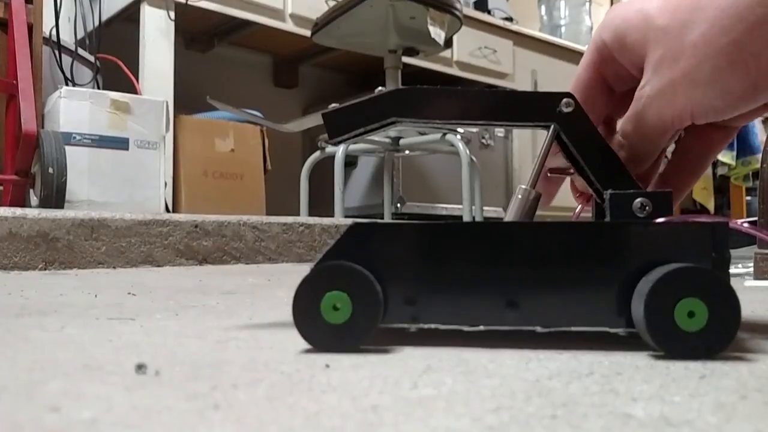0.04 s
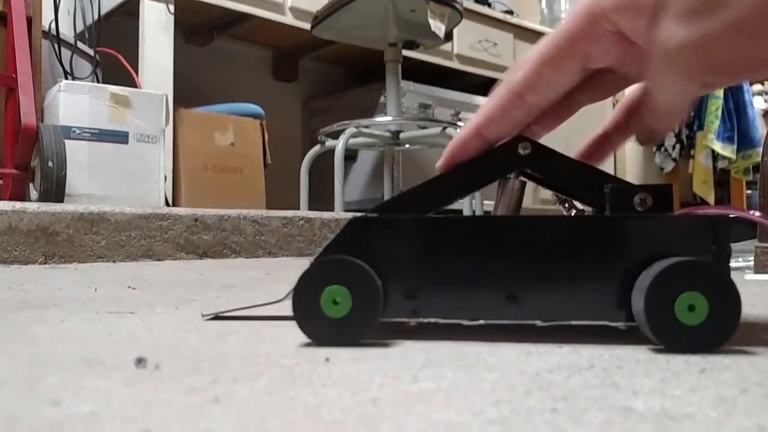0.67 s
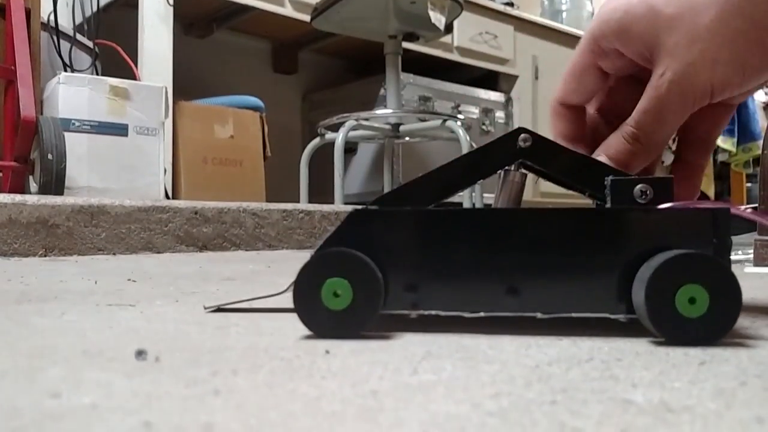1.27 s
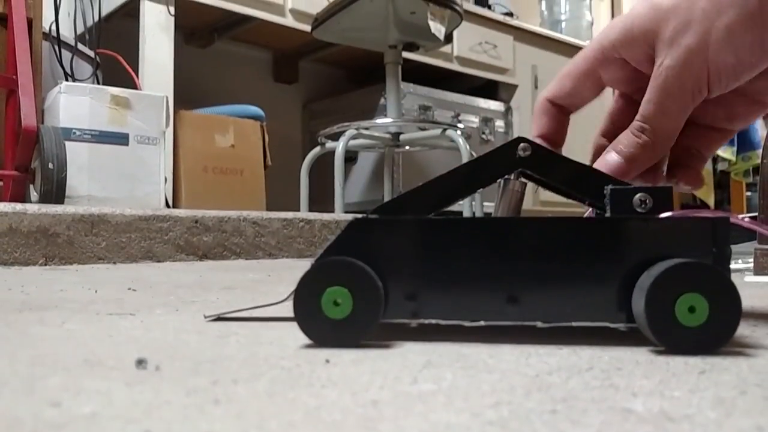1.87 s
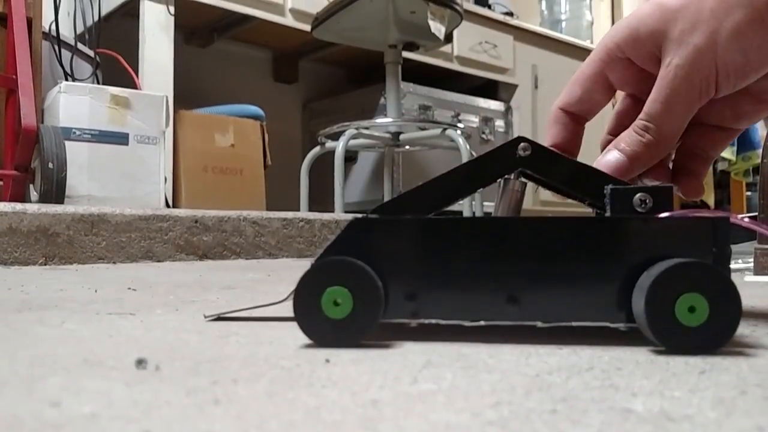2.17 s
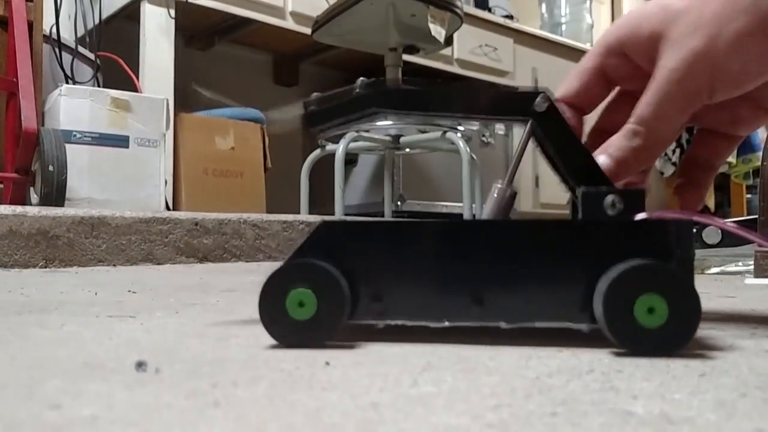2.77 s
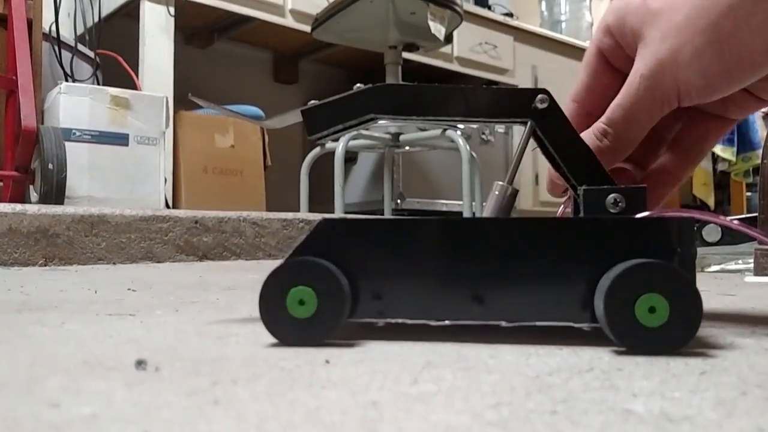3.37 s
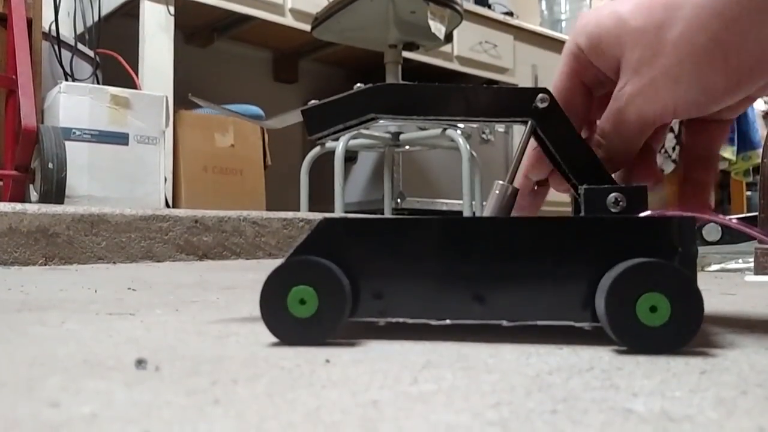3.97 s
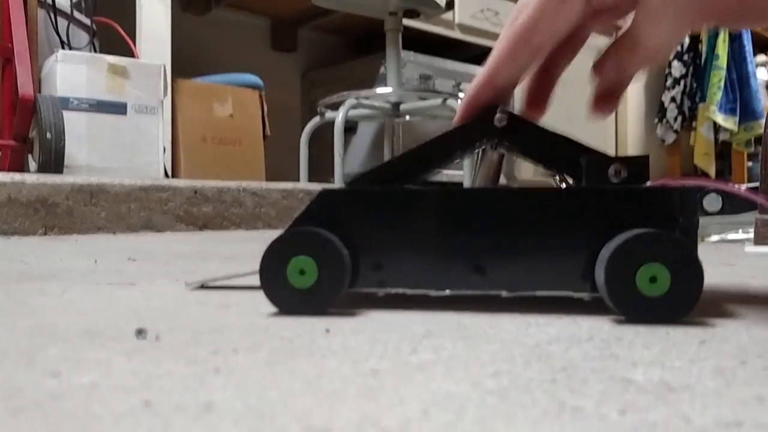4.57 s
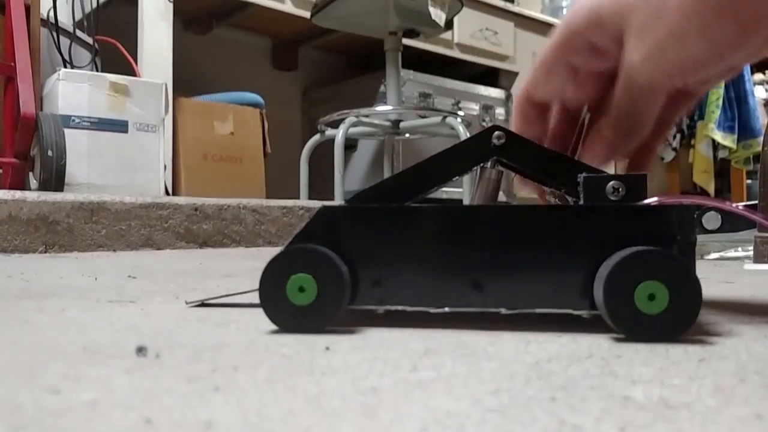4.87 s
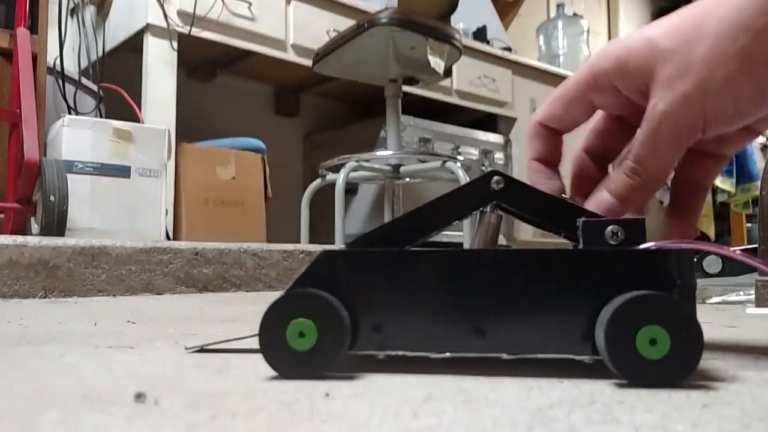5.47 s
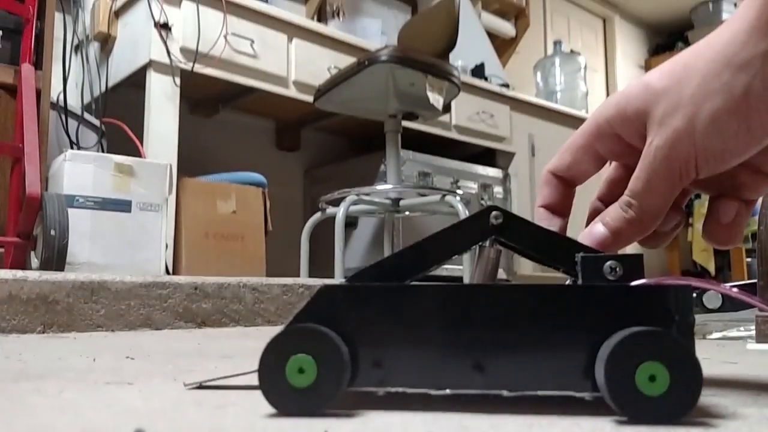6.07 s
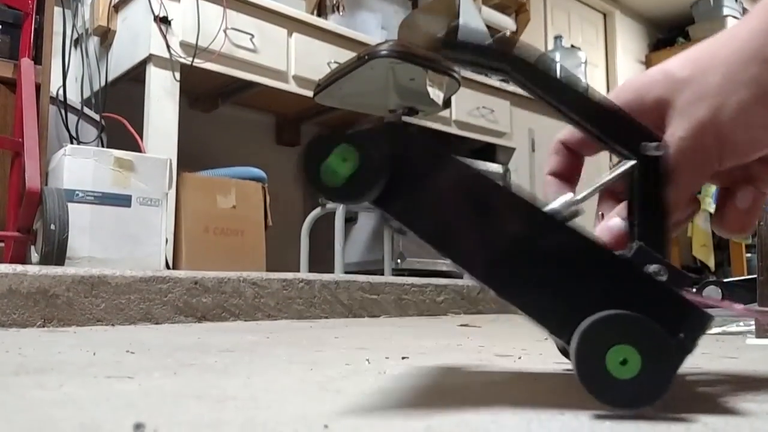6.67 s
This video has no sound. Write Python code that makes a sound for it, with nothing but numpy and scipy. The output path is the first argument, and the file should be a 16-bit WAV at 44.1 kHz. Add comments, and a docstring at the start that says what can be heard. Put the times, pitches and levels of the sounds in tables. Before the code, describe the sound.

Close to the microphone in a garage, a small robot's metal arm is pushed shut with a light clack. Its pneumatic flipper then fires with a loud, rattling snap, and the robot clatters back onto concrete. Faint handling ticks, a short puff of air and another closing clack follow, before a second loud snap at the very end. A low motor hum runs quietly behind it all.

```python
"""Pneumatic flipper robot in a garage

A small metal robot on the concrete floor, close to one microphone, fires its flipper twice.
The arm slams into its stop and chatters; after the first shot the robot lands and bounces.
A valve puffs the air out, a hand pushes the arm shut, and a motor hums in the room behind.
The recorder's limiter ducks on each shot and lets the hum swell back slowly."""
import sys
import numpy as np
from scipy import signal
from scipy.fft import rfft, irfft, next_fast_len
from scipy.io import wavfile
from scipy.ndimage import uniform_filter1d

SR = 44100
rng = np.random.default_rng(int(sys.argv[2]) if len(sys.argv) > 2 else 0)


def inscribe(sig):
    """Save sig as 16-bit PCM at rate SR to the path in sys.argv[1].

    A 1-D sig is mono; a 2-D sig holds one channel per row.
    Samples are clipped to [-1, 1] before scaling.
    """
    pcm = np.round(np.clip(np.atleast_2d(sig).T, -1, 1) * 32767)
    wavfile.write(sys.argv[1], SR, pcm.astype(np.int16))


N = 296793

# Levels are those ahead of the limiter. the flipper fires: start_s, stop_db, rebound_db and late_knock_db
# (relative to the stop), rebound_loss_db
SHOTS = [(2.4683, 15.5, -10, -11.5, 2.17), (6.6179, 14.5, -10.5, -14, 1.7)]
# modes of the arm and chassis: pitch_hz, level_db, t60_s
METAL_MODES = [(771, -3, 0.044), (796, -2, 0.028), (848, -1, 0.067), (958, 8.5, 0.016), (1050, -3.5, 0.079),
               (1262, 5.5, 0.019), (1358, -9, 0.038), (1464, 3.5, 0.035), (1620, -13.5, 0.021),
               (1742, -16.5, 0.056), (2035, -0.5, 0.029), (2430, -26, .02), (3180, -15.5, .02),
               (3670, -15, 0.032)]
# spectrum of a hard contact's crack: frequency_hz, density_db
CRACK_SPECTRUM = [(60, -4), (200, 4.5), (550, -3), (1400, 5.5), (2600, -1.5), (3900, -6.5), (5200, -14.5),
                  (8000, -21), (12000, -30), (16000, -36)]
# the robot bounces on the concrete: start_s, level_db, low_hz, knock_count
LANDINGS = [(2.7708, 0, 680, 5), (2.861, -11.5, 1300, 2), (2.938, -24, 1600, 1)]
# the arm is pushed shut: start_s, level_db, gap_s, knock_loss_db, low_hz, high_hz, crack_db
CLOSINGS = [(0.720, -14.5, 0.0058, 0.7, 684, 1320, -10.5), (4.6455, -15, 0.01, 4.5, 480, 1620, -9.5)]
# the arm shifts in its joints under the hand: start_s, level_db, low_hz, high_hz, crack_db
JOINT_TAPS = [(.307, -33, 350, 1480, -13), (.847, -29, 1260, 1900, -28), (1.242, -43, 2360, 4230, 3),
              (3.402, -29.5, 1210, 2500, -12), (4.178, -34, 800, 4000, -11)]
# fingers tick and bump on the linkage and hose: start_s, level_db, pitch_hz, width_hz, t60_s
FINGER_TOUCHES = [(2.041, -57.5, 7900, 7000, 0.022), (2.963, -43.5, 2880, 1510, 0.075),
                  (3.879, -50.5, 7400, 6000, 0.021), (5.283, -23.5, 142, 110, 0.053)]
# the valve vents: start_s, level_db
PUFFS = [(-.055, -25.5), (3.738, -22.5)]
# spectrum of the air jet: frequency_hz, density_db
JET_SPECTRUM = [(100, -24), (350, 1), (750, -2), (1100, -8), (1450, -0.5), (2400, -4), (4300, -9),
                (7500, -7), (11000, -14), (15500, -20)]
# cavities that the jet sounds: pitch_hz, width_hz, boost_db
JET_CAVITIES = [(910, 230, 14), (1934, 45, 17.5), (2970, 60, 8.8), (3170, 75, 4.7)]
# tones of the motor and its housing: pitch_hz, level_db
HUM_TONES = [(59.2, -63.5), (74, -55), (118.4, -53.5), (148, -51.5), (220.7, -49.5), (239, -51.5),
             (331, -55), (354.6, -46.5), (603, -59), (1184, -61)]
# rush of air behind the hum: frequency_hz, density_db
AIR_SPECTRUM = [(20, -8.5), (45, -6), (90, -4), (160, 0), (330, -2), (420, -6.5), (700, -11), (1200, -15),
                (1900, -28.5), (2600, -30.5), (4000, -41.5), (7000, -49), (15000, -56.5)]
# reverberation of the garage: frequency_hz, t60_s
GARAGE_DECAY = [(150, 0.53), (1000, 0.35), (2000, 0.39), (5000, 0.51), (13000, 0.23)]


def flipper(stroke_s=0.0232, chatter_gap_s=0.0117, late_knock_s=0.0455):
    """The piston takes up the slack, the arm slams into its stop and chatters, and one late rebound lands as a
    dull knock."""
    # kinds of contact: low_hz, high_hz, crack_db
    slack, slam = (560, 3200, -11), (850, 1600, -14)
    chatter, late_knock = (850, 1600, -11.5), (700, 1150, -16)
    thump = (318, 280, 0.037)  # the piston bottoms out: pitch_hz, width_hz, t60_s
    hits, thumps = [], []
    for start_s, stop_db, rebound_db, late_knock_db, loss_db in SHOTS:
        stop_s = start_s + stroke_s
        hits += bounces(start_s, stop_db - 30.5, gap_s=0.0036, step_db=2.5, contact=slack, count=3)
        hits.append((stop_s, stop_db, *slam))
        hits.append((stop_s + late_knock_s, stop_db + late_knock_db, *late_knock))
        hits += bounces(stop_s + chatter_gap_s, stop_db + rebound_db, chatter_gap_s, -loss_db,
                        chatter, count=7)
        thumps.append((stop_s, stop_db - 12.5, *thump))
    return metal_blows(hits) + rings(thumps)


def metal_blows(hits, scatter_db=3.0, detune=0.017, scatter_turns=0.17, contact_s=0.00089):
    """Each blow rings the metal, mainly the modes between low_hz and high_hz, and adds a short crack."""
    out, t = np.zeros(N), seconds(.15)
    hz, mode_db, t60_s = np.array(METAL_MODES).T[:, :, None]
    decay = dying(t, t60_s)
    for start_s, level_db, low_hz, high_hz, crack_db in hits:
        strength, shift, lag = rng.standard_normal((3, len(hz), 1))
        reach = 1 / np.sqrt((1 + (low_hz / hz) ** 4) * (1 + (hz / high_hz) ** 4))
        gains = reach * from_db(mode_db + scatter_db * strength)
        # loose joints shift the modes a little, and each reaches the microphone by its own path
        turns = hz * (1 + detune * shift) * t + scatter_turns * lag
        ring = np.sum(gains * decay * np.cos(2 * np.pi * turns), axis=0)
        # the hardest blows make the briefest contact, and so the sharpest crack
        quick_t = t * from_db(0.13 * max(level_db, 0))
        ring *= rising(quick_t, contact_s)
        crack = noise(CRACK_SPECTRUM, len(t))
        crack *= rising(quick_t, rise_s=0.0037) * dying(quick_t, t60_s=0.047)
        onset_height = np.sqrt(2 * np.mean(ring[t < .003] ** 2))
        add(out, start_s, from_db(level_db) * (ring / onset_height + from_db(crack_db) * crack))
    return out


def bounces(start_s, level_db, gap_s, step_db, contact, count, thinning=1):
    """List evenly spaced blows that step in level; thinning multiplies the low edge at each one."""
    low_hz, high_hz, crack_db = contact
    return [(start_s + k * gap_s, level_db + k * step_db, low_hz * thinning ** k, high_hz, crack_db)
            for k in range(count)]


def rings(rows):
    """Thumps, pings and ticks: bands of noise that die quickly."""
    out, t = np.zeros(N), seconds(.2)
    for start_s, level_db, pitch_hz, width_hz, t60_s in rows:
        ring = band(rng.standard_normal(len(t)), pitch_hz - width_hz / 2, pitch_hz + width_hz / 2)
        add(out, start_s, from_db(level_db) * unit_rms(ring) * dying(t, t60_s))
    return out


def landings(high_hz=2350, crack_db=-8):
    """The robot drops back on its wheels; each bounce is lighter and thinner and shakes the loose arm."""
    hits = []
    for start_s, level_db, low_hz, knocks in LANDINGS:
        hits += bounces(start_s, level_db, gap_s=0.0135, step_db=-3,
                        contact=(low_hz, high_hz, crack_db), count=knocks, thinning=1.23)
    return metal_blows(hits)


def closings():
    """The arm's scoop bounces on the floor in a tight triple clack while its thin tip pings."""
    ping = (10280, 600, 0.063)  # pitch_hz, width_hz, t60_s
    hits, pings = [], []
    for start_s, level_db, gap_s, loss_db, *contact in CLOSINGS:
        hits += bounces(start_s, level_db, gap_s, -loss_db, contact, count=3)
        pings.append((start_s, level_db - 32, *ping))
    return metal_blows(hits) + rings(pings)


def valve(attack_s=0.018, swell_db=31, hold_s=0.022):
    """The cylinder empties in a short jet that sounds the hollow chassis and the room."""
    out, t = np.zeros(N), seconds(.1)
    opening = from_db(swell_db * np.minimum(t / attack_s - 1, 0))
    emptying = dying(np.maximum(t - attack_s - hold_s, 0), t60_s=0.058)
    for start_s, level_db in PUFFS:
        jet = opening * emptying * noise(JET_SPECTRUM, len(t), JET_CAVITIES)
        add(out, start_s, garage(from_db(level_db) * jet, wet_db=-14.0))
    return out


def handling():
    """The hand nudges the arm, ticks on the linkage and scuffs the hose."""
    return metal_blows(JOINT_TAPS) + rings(FINGER_TOUCHES) + scuffs()


def scuffs(start_s=2.98, end_s=3.9, level_db=-74, slips_per_s=70, spread_db=4.0):
    """Skin sticks and slips on the valve and hose in tiny irregular grains of hiss."""
    t = np.arange(N) / SR
    slips = rng.random(N) < slips_per_s / SR
    strength = from_db(spread_db * np.minimum(rng.exponential(1, N), 2))
    grains = signal.fftconvolve(slips * strength, dying(seconds(.05), t60_s=0.0088))[:N]
    hiss = unit_rms(band(grains * rng.standard_normal(N), low_hz=3200, high_hz=11000))
    return from_db(level_db) * hiss * (t > start_s) * (t < end_s)


def motor(waver_db=0.15, waver_rad=0.54, wavers_per_s=7, air_db=-41.5):
    """The room tone: a motor's slightly wavering hum over a steady rush of air."""
    hum, t = np.zeros(N), np.arange(N) / SR
    for pitch_hz, level_db in HUM_TONES:
        amplitude = np.sqrt(2) * from_db(level_db - waver_db * drift(wavers_per_s))
        phase = 2 * np.pi * (pitch_hz * t + rng.random()) + waver_rad * drift(wavers_per_s)
        hum += amplitude * np.sin(phase)
    return hum + from_db(air_db) * noise(AIR_SPECTRUM, next_fast_len(N))[:N]


def garage(x, wet_db):
    """Direct sound at the microphone, plus dense reflections that build up and die band by band."""
    t = seconds(.5)
    edges_hz = np.geomspace(60, 18000, 9)
    tail = np.zeros(len(t))
    for low_hz, high_hz in zip(edges_hz, edges_hz[1:]):
        t60_s = at_hz(GARAGE_DECAY, np.sqrt(low_hz * high_hz))
        tail += band(rng.standard_normal(len(t)), low_hz, high_hz) * dying(t, t60_s)
    tail *= rising(t, rise_s=0.00093)
    response = from_db(wet_db) * tail / np.linalg.norm(tail)
    response[0] += 1  # the direct path
    return signal.fftconvolve(x, response)


def from_db(db):
    """Decibels to gain."""
    return 10 ** (np.asarray(db) / 20)


def unit_rms(x):
    """Scale to unit rms."""
    return x / np.sqrt(np.mean(x ** 2) + 1e-20)


def seconds(length_s):
    """Time axis of a given length."""
    return np.arange(int(length_s * SR)) / SR


def rising(t, rise_s):
    """Exponential rise from zero towards one."""
    return 1 - np.exp(-t / rise_s)


def dying(t, t60_s):
    """Exponential decay, 60 dB down at t60_s."""
    return np.exp(-np.log(1000) * t / t60_s)


def at_hz(points, hz):
    """Read a table on a log-frequency axis."""
    points = np.array(points)
    return np.interp(np.log(hz + 1e-9), np.log(points[:, 0]), points[:, 1])


def noise(spectrum, size, cavities=()):
    """Noise of unit rms with a smooth spectrum, lifted at any cavity resonances."""
    hz = np.fft.rfftfreq(size, 1 / SR)
    gain = from_db(at_hz(spectrum, hz))
    for pitch_hz, width_hz, boost_db in cavities:
        gain *= 1 + (from_db(boost_db) - 1) / np.hypot(1, 2 * (hz - pitch_hz) / width_hz)
    return unit_rms(irfft(rfft(rng.standard_normal(size)) * gain, size))


def band(x, low_hz, high_hz):
    """Causal band-pass."""
    return signal.sosfilt(signal.butter(2, [low_hz, high_hz], "band", fs=SR, output="sos"), x)


def drift(points_per_s):
    """Slow wandering between random values of unit spread."""
    return np.interp(np.arange(N) / SR * points_per_s, np.arange(400), rng.standard_normal(400))


def add(out, start_s, sound):
    """Mix a sound in at a time, which may lie before zero."""
    at = round(start_s * SR)
    sound, at = sound[max(-at, 0):], max(at, 0)
    out[at:at + len(sound)] += sound[:N - at]


def scene():
    """What reaches the microphone: robot, hand and valve close up, the motor behind them."""
    firing = garage(flipper() + landings(), wet_db=-12.5)[:N]
    # the closing clacks and handling taps, with slightly less garage reverberation
    by_hand = garage(closings() + handling(), wet_db=-13.5)[:N]
    return (firing + by_hand + valve() + motor())[None]


def limiter(x, threshold_db=-5.0, release_db_per_s=10.5, start_cut_db=4.0):
    """Gain drops at once on a loud peak and creeps back; it starts out partly lowered."""
    power = uniform_filter1d(x ** 2, size=132)  # 3 ms window
    over_db = np.maximum(10 * np.log10(np.maximum(power, 1e-12)) - threshold_db, 0)
    over_db[0] = start_cut_db
    recovery_db = release_db_per_s * np.arange(N) / SR
    cut_db = np.maximum.accumulate(over_db + recovery_db) - recovery_db
    return x * from_db(-uniform_filter1d(cut_db, size=44))


def record(dry, hiss_db=-82.5, clip_level=.92, cutoff_hz=16400):
    """The mono recorder: limiter, electronic hiss, clipping just under full scale, a steep top cut."""
    hiss = from_db(hiss_db) * rng.standard_normal(N)
    clipped = np.clip(limiter(dry[0]) + hiss, -clip_level, clip_level)
    top_cut = signal.cheby2(12, 70, cutoff_hz, fs=SR, output="sos")
    return signal.sosfilt(top_cut, clipped)[None]


dry = scene()
out = record(dry)
inscribe(out)
```